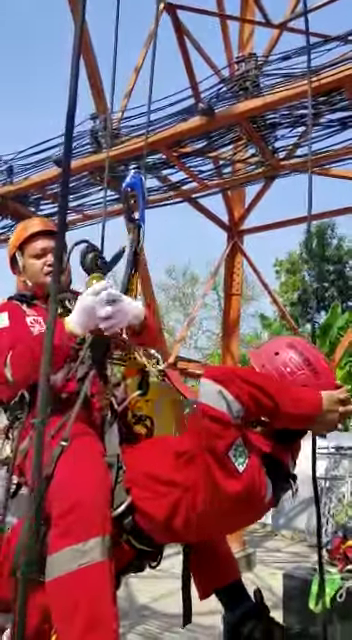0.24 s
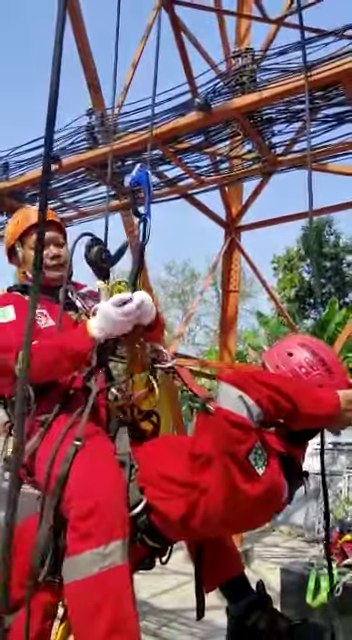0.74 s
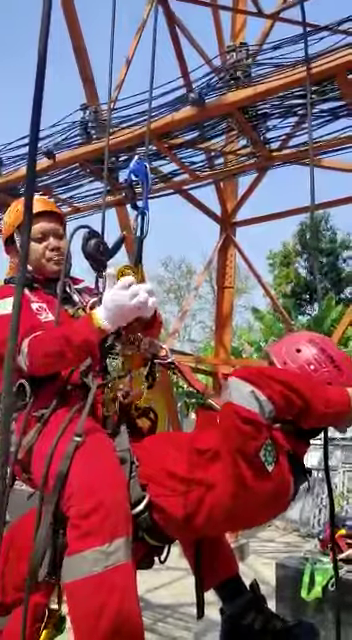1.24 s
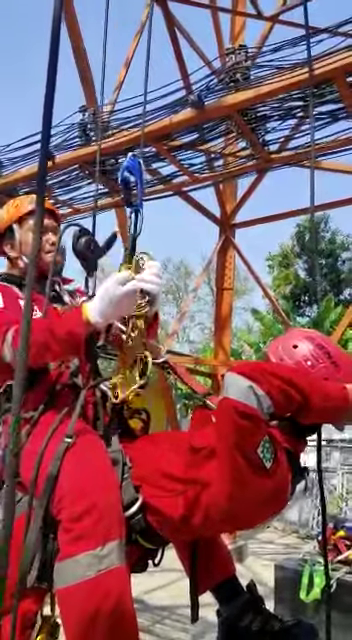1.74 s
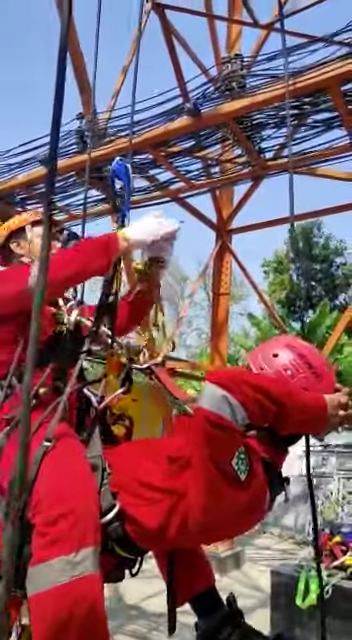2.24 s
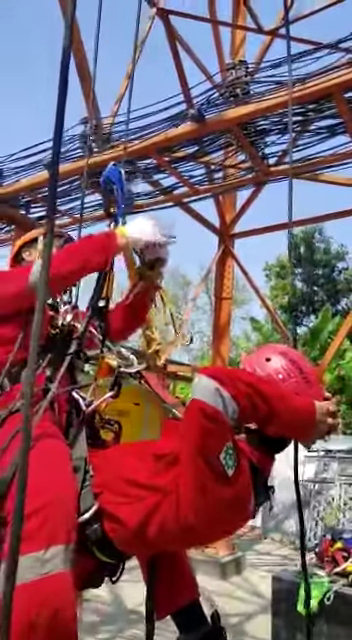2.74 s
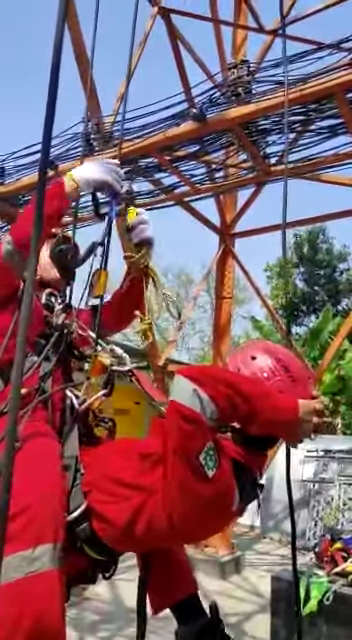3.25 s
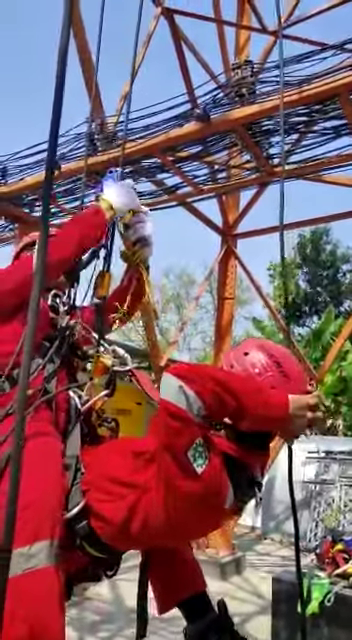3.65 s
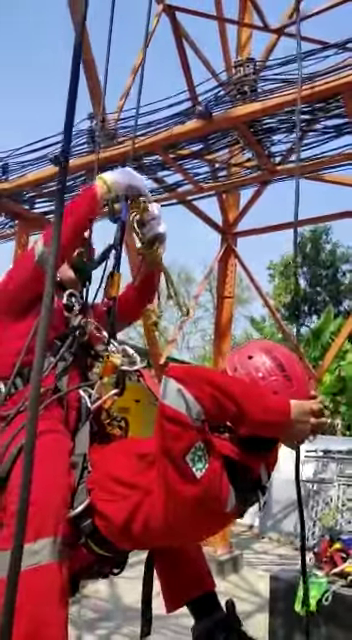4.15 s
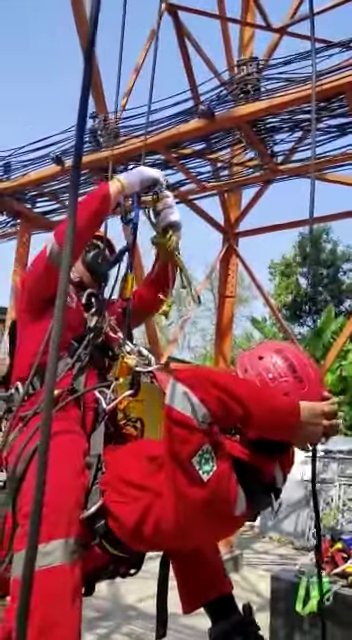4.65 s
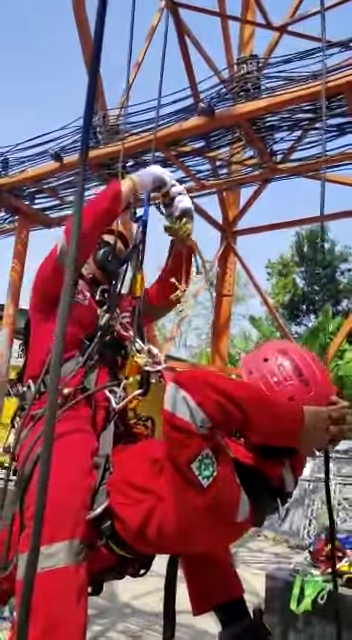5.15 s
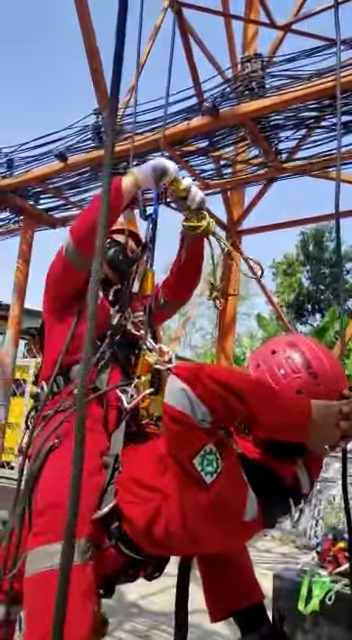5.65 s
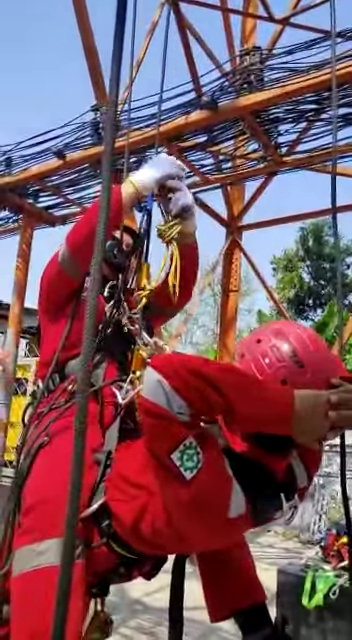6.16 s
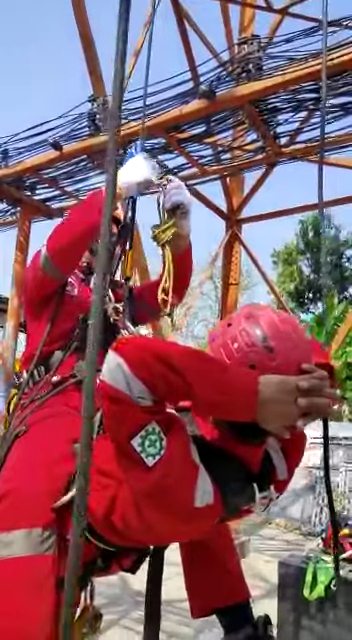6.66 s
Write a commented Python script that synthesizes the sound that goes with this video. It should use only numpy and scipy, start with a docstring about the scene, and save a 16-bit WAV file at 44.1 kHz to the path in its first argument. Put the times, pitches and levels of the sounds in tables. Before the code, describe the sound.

Close by, metal climbing clips click and clink in small irregular groups, with faint squeaks and short ringing tails. Hard surroundings give a brief echo. Behind, mostly to the right, a dull low drone swells and fades with hollow hoots and faint hiss. Near six seconds a sprung gate snaps shut, by far the loudest sound, followed by low buffeting on the microphone and more clinks.

```python
"""Rope rescue hardware under a steel frame

Rope rescuers handle their hardware: carabiners click and clink in gloved hands, built from contact noise and
metal modes. Rubbed metal squeaks and struck metal lingers in bands of noise; one sprung gate snaps shut.
Hard surroundings answer. Behind them a dull outdoor drone of filtered noise swells and fades, with hollow
hoots, faint rustle and hiss. Near the end a low rumble buffets the microphone."""
import sys
import numpy as np
from scipy import signal
from scipy.fft import rfft, irfft, next_fast_len
from scipy.io import wavfile
from scipy.ndimage import uniform_filter1d, map_coordinates

SR = 44100
rng = np.random.default_rng(int(sys.argv[2]) if len(sys.argv) > 2 else 0)


def int16_out(signal):
    """Quantize to a 16-bit WAV file."""
    q = np.round(np.clip(np.atleast_2d(signal).T, -1, 1) * 32767)
    wavfile.write(sys.argv[1], SR, q.astype(np.int16))


N = 303849  # length of the scene in samples
SIDES = np.array([[1], [-1]])  # left, right


def amp(db):
    """Turn decibels into a gain."""
    return 10 ** (np.asarray(db) / 20)


def unit(x):
    """Scale a signal to an rms of 1."""
    return x / np.sqrt(np.mean(x ** 2) + 1e-20)


def balance(left_db):
    """Gains that make the left side this many dB stronger than the right."""
    return amp(left_db / 2 * SIDES)


def along(points, hz):
    """Read a curve of (Hz, value) points on a log frequency axis."""
    f, v = np.transpose(points)
    return np.interp(np.log(hz + 1), np.log(f + 1), v)


def over_time(points):
    """Draw straight lines between (seconds, value) points, one value per sample."""
    s, v = np.transpose(points)
    return np.interp(np.arange(N) / SR, s, v)


def filtered(x, response):
    """Multiply the spectrum of x by a complex response of frequency."""
    n = x.shape[-1]
    m = next_fast_len(n + 8192)  # spare room for the filter's tail
    return irfft(rfft(x, m) * response(np.fft.rfftfreq(m, 1 / SR)), m)[..., :n]


def coloured(x, points):
    """Pass x through a smooth (Hz, dB) curve."""
    return filtered(x, lambda hz: amp(along(points, hz)))


def bump(hz, centre_hz, width_hz):
    """A resonance curve of height 1."""
    return 1 / (1 + ((hz - centre_hz) / width_hz) ** 2)


def resonating(x, gain_db):
    """Pass x through a body with this gain over frequency; it rings only after it is struck."""
    n = x.shape[-1]
    cepstrum = irfft(np.log(amp(gain_db(np.fft.rfftfreq(2 * n, 1 / SR)))))
    # folding the cepstrum gives minimum phase, so no sound comes before the strike
    cepstrum[1:n] *= 2
    cepstrum[n + 1:] = 0
    return irfft(rfft(x, 2 * n) * np.exp(rfft(cepstrum)))[..., :n]


def envelope(s, length, rise_s, fall_s):
    """A smooth rise up to time s, a hold, a smooth fall."""
    ramp = np.interp(np.arange(N) / SR, [s - rise_s, s, s + length, s + length + fall_s], [0, 1, 1, 0])
    return ramp * ramp * (3 - 2 * ramp)


def swelling(rows, rise_s, fall_s):
    """The gain of a row of swells: the strongest one at each moment."""
    return np.max([amp(db) * envelope(s, length, rise_s, fall_s) for s, length, db in rows], axis=0)


def wobble(rate):
    """A smooth random curve with this many knots a second."""
    return map_coordinates(rng.standard_normal(256), [np.arange(N) * rate / SR], mode="mirror")


def add(track, s, sound):
    """Mix a sound in at time s."""
    part = track[..., max(round(s * SR), 0):][..., :sound.shape[-1]]
    part += sound[..., :part.shape[-1]]


def ports(x, lag_ms):
    """A sound reaches the left microphone a little after the right."""
    return filtered(x, lambda hz: np.exp(-1j * np.pi * hz * lag_ms / 1000 * SIDES))


def rush(spectrum, apart_db, left_db, patchy_db, lag_ms):
    """Stereo noise of rms 1 in patches of random gain: a shared part and each side's own."""
    z = signal.stft(rng.standard_normal((3, N)), nperseg=1024)[2]
    field = uniform_filter1d(rng.standard_normal(z.shape[1:]), size=4, axis=0)
    field = uniform_filter1d(field, size=6, axis=1)
    noise = signal.istft(z * amp(patchy_db * unit(field)), nperseg=1024)[1][:, :N]
    pair = ports(noise[0], lag_ms) + amp(apart_db) * noise[1:]
    return unit(coloured(pair * balance(left_db), spectrum))


# How long the late echo lasts. Each row: frequency in Hz, time to fall by 60 dB in seconds.
YARD = [(300, 0.38), (2000, 0.42), (7000, 0.33), (10000, 0.31), (15000, 0.28)]


def yard(x, early_db, late_db, early_t60):
    """Near surfaces answer at once, the wider yard dies away more slowly."""
    hz, t, z = signal.stft(rng.standard_normal((2, SR // 2)), SR, nperseg=256)
    late = signal.istft(z * amp(-60 * t / along(YARD, hz)[:, None]), SR, nperseg=256)[1]
    t = np.arange(late.shape[1]) / SR
    build = 1 - np.exp(-(t / 0.0009) ** 2)
    early = rng.standard_normal(late.shape) * amp(-60 * t / early_t60)
    answer = amp(early_db) * unit(early * build) + amp(late_db) * unit(late * build)
    return signal.fftconvolve(x[None], answer / np.sqrt(len(t)), axes=1)[:, :len(x)]


# Tone of the rustle, the low air and the hiss. Each row: frequency in Hz, relative level in dB.
RUSTLE = [(200, -54.5), (700, -3), (1100, -3), (1450, -9), (2400, -10), (2800, -20), (4000, -37.5),
          (7000, -120)]
BREEZE = [(12, -31), (20, -15), (49, -1.5), (168, -6), (189, -1.5), (230, -5), (300, -26.5), (510, -120)]
HISS = [(1000, 4), (2400, -2.5), (3000, 0.5), (4000, -3.5), (5500, -0.5), (7000, 5.5), (8000, -4),
        (9000, -15.5), (15000, -17.5)]
# Loudness of the light rustle. Each row: time in seconds, level in dB.
LEAVES = [(0, -74.5), (1.9, -73), (2.75, -70), (3.3, -71.5), (4.4, -68), (5.1, -70.5), (6.89, -69.5)]
# Puffs of low air on the microphone. Each row: time of the peak in seconds, level in dB.
PUFFS = [(.09, -59), (2.06, -56), (4.14, -59.5), (4.94, -67), (5.66, -64)]
PUFF_RISE_S, PUFF_FALL_S = 0.059, 0.14
AIR_DB, AIR_WANDER_DB, AIR_WANDER_PER_S = -65, 2.53, 5  # middle level, size and rate of its wandering


def outdoors():
    """Filtered noise as faint rustle, low air that wanders and puffs on the microphone, and hiss."""
    rustle = amp(over_time(LEAVES)) * rush(RUSTLE, apart_db=4.5, left_db=2.0, patchy_db=5.5, lag_ms=0.11)
    puffs = sum(amp(db) * envelope(s, 0, PUFF_RISE_S, PUFF_FALL_S) for s, db in PUFFS)
    air_gain = np.hypot(amp(AIR_DB + AIR_WANDER_DB * wobble(AIR_WANDER_PER_S)), puffs)
    air = air_gain * rush(BREEZE, apart_db=-20.0, left_db=-1.5, patchy_db=-1.5, lag_ms=0.16)
    hiss = amp(-85.5) * rush(HISS, apart_db=9.0, left_db=-0.5, patchy_db=3.0, lag_ms=0)
    return rustle + air + hiss


# Tone of the drone, its upper register and its surge. Each row: frequency in Hz, relative level in dB.
HUM = [(60, -65), (130, -34.5), (210, -6.5), (280, 5), (345, 5.5), (410, -6), (520, -16), (900, -70.5),
       (2500, -120)]
UPPER = [(200, -65), (350, -27), (480, -6.5), (570, 1), (660, -0.5), (770, -18.5), (1200, -55),
         (3500, -120)]
SURGE_TONE = [(150, -62), (330, -9), (430, 7.5), (520, -0.5), (620, -19.5), (1000, -62), (2500, -120)]
# Swells of the drone. Each row: start of the hold in seconds, length of the hold in seconds, level in dB.
SWELLS = [(.04, 0.061, -54), (.46, 0.039, -56), (.62, 0.11, -56.5), (1.0, 0.18, -59.5), (1.18, 0.29, -54.5),
          (1.55, 0.11, -61), (1.93, 0.045, -56.5), (1.99, 0.23, -54.5), (2.2, 0.044, -53),
          (2.58, 0.12, -53.5), (2.89, 0.19, -53.5), (3.49, 0.11, -59.5), (3.61, 0.33, -53),
          (4.07, 0.08, -51), (4.24, 0.15, -57.5), (4.47, 0.13, -49.5), (4.7, 0.15, -61.5),
          (5.06, 0.16, -54.5), (5.45, 0.029, -51.5), (5.67, 0.026, -45.5), (6.16, 0.32, -63.5)]
SWELL_RISE_S, SWELL_FALL_S, HUM_REST_DB = 0.031, 0.11, -66.5  # shape of every swell; level between them
# Gain of the drone's lowest register. Each row: time in seconds, gain in dB.
HUM_LOW = [(4.8, 2), (5.2, -9.5)]
# Loudness of the upper register. Each row: time in seconds, level in dB.
UPPER_LEVEL = [(0, -74), (2.4, -76.5), (3.1, -71), (3.55, -76), (3.95, -66.5), (4.4, -61), (4.7, -68),
               (5.2, -75.5), (5.6, -70), (5.85, -60), (6.45, -68), (6.89, -78)]
SURGE_S, SURGE_HOLD_S, SURGE_RISE_S, SURGE_FALL_S, SURGE_DB = 4.08, 0.19, 0.14, 0.13, -49
SURGE_WAKE_S, SURGE_WAKE_DB = 0.4, -58.5  # a weaker wake outlasts the surge


def drone():
    """Low bands of noise from the right swell again and again, vary in the upper register and surge once."""
    hum_gain = np.hypot(amp(HUM_REST_DB), swelling(SWELLS, SWELL_RISE_S, SWELL_FALL_S))
    hum = hum_gain * rush(HUM, apart_db=-9.5, left_db=-7.5, patchy_db=3, lag_ms=0.33)
    low = filtered(hum, lambda hz: 1 / (1 + (hz / 315) ** 16))
    hum = hum - low + amp(over_time(HUM_LOW)) * low
    upper = amp(over_time(UPPER_LEVEL)) * rush(UPPER, apart_db=-2.5, left_db=-4.5, patchy_db=5.0, lag_ms=0.31)
    surge_rows = [(SURGE_S, SURGE_HOLD_S, SURGE_DB), (SURGE_S, SURGE_WAKE_S, SURGE_WAKE_DB)]
    surge_gain = swelling(surge_rows, SURGE_RISE_S, SURGE_FALL_S)
    surge = surge_gain * rush(SURGE_TONE, apart_db=6.0, left_db=-13.0, patchy_db=7.0, lag_ms=0.13)
    return hum + upper + surge


# Brief hollow hoots. Each row: start of the hold in seconds, its length in seconds, pitch in Hz, level in dB.
HOOTS = [(0.531, 0.013, 618, -65.5), (2.034, 0.023, 963, -66), (2.753, 0.043, 1070, -66),
         (2.85, 0.034, 613, -59.5), (3.335, 0.067, 620, -62), (4.157, 0.082, 550, -57.5),
         (5.678, 0.047, 605, -58.5), (6.203, 0.17, 616, -62.5), (6.58, 0.086, 592, -61),
         (6.772, 0.075, 575, -61)]
HOOT_RISE_S, HOOT_FALL_S, HOOT_WIDTH_HZ = 0.02, 0.026, 80


def hoots():
    """Each hoot is a narrow band of noise that comes and goes quickly, a little to the right."""
    out, t = np.zeros((2, N)), np.arange(SR // 2) / SR
    for s, length, pitch_hz, db in HOOTS:
        noise = rng.standard_normal((3, len(t)))
        band = unit(filtered(noise, lambda hz: bump(hz, pitch_hz, HOOT_WIDTH_HZ) ** 2))
        shape = np.interp(t, np.cumsum([0, HOOT_RISE_S, length, HOOT_FALL_S]), [0, 1, 1, 0])
        pair = (band[0] + amp(-1.0) * band[1:]) * amp([[-4], [0]])  # a shared part and each side's own
        add(out, s - HOOT_RISE_S, amp(db) * shape * unit(pair))
    return out


# Tone of the rumble. Each row: frequency in Hz, relative level in dB.
BUFFET = [(12, -40.5), (20, -14), (76, 2.5), (140, -4), (203, -12), (228, -32), (258, -16.5), (331, -49),
          (400, -61), (520, -67.5), (880, -120)]
# Gusts on the microphone. Each row: start of the hold in seconds, length of the hold in seconds, level in dB.
GUSTS = [(5.98, 0.027, -50), (6.11, 0.35, -41.5), (6.38, 0.047, -36.5), (6.55, 0.183, -45),
         (6.78, 0.014, -46.5)]
GUST_RISE_S, GUST_FALL_S = 0.046, 0.12
# Soft bumps on the microphone. Each row: start in seconds, pitch in Hz, level in dB.
THUMPS = [(6.1, 89.5, -29), (6.4, 123, -33.5)]


def buffeting():
    """Low noise rumbles in lumps, with two soft short tones as thumps, mostly on the right microphone."""
    gain = swelling(GUSTS, GUST_RISE_S, GUST_FALL_S)
    out = gain * rush(BUFFET, apart_db=1.0, left_db=-13, patchy_db=1.5, lag_ms=0.1)
    t = np.arange(SR // 5) / SR
    swell = np.exp(-((t - 0.018) / 0.011) ** 2)
    for s, hz, db in THUMPS:
        add(out, s, amp(db) * swell * np.sin(2 * np.pi * hz * t) * amp([[-11], [0]]))
    return out


# Rubbed metal, and the lingering ring of struck metal: narrow squeaks, wide scrapes, fading clink tails.
# Each row: start in seconds, length in seconds, pitch in Hz, width of the band in Hz, level in dB.
METAL_BANDS = [(0, 0.04, 6430, 1380, -65), (0, 0.041, 2510, 304, -63), (0.178, 0.078, 5000, 620, -71),
               (0.235, 0.15, 5000, 560, -69), (0.313, 0.044, 3120, 220, -63), (0.42, 0.107, 2500, 256, -70),
               (0.51, 0.19, 2390, 398, -73.5), (2.698, 0.26, 5850, 200, -64),
               (3.236, 0.029, 3000, 1200, -62.5), (5.283, 0.16, 2110, 170, -67),
               (5.551, 0.28, 4940, 1030, -64.5), (6.46, 0.14, 2493, 250, -67),
               (6.597, 0.29, 2340, 137, -73)]
WAVER, WAVER_PER_S = 0.005, 49  # the pitch wavers: share of the pitch, knots a second
HARDWARE_LAG_MS = 0.12  # the left microphone hears the hardware later


def squeaks_and_tails():
    """Rubbed metal, or the tail of a clink, is a band of noise with a weak higher band and faint grit."""
    out, t = np.zeros((2, N)), np.arange(SR) / SR
    for s, length, pitch_hz, width_hz, db in METAL_BANDS:
        def band(hz):
            main = bump(hz, pitch_hz, width_hz) ** 2
            higher = amp(-27) * bump(hz, 1.69 * pitch_hz, 2 * width_hz) ** 2
            grit = amp(-26) * bump(hz, pitch_hz, pitch_hz / 2) ** 2
            return main + higher + grit
        swell = np.sin(np.pi * np.clip(t / length, 0, 1) ** 0.5) ** 2  # quick rise, slower fall
        flicker = amp(7.3 * unit(uniform_filter1d(rng.standard_normal(SR), size=200)))
        tone = filtered(flicker * rng.standard_normal(SR), band)
        travel = np.cumsum(1 + WAVER * wobble(WAVER_PER_S)[:SR])  # uneven reading speed bends the pitch
        x = amp(db) * swell * unit(map_coordinates(tone, [travel]))
        add(out, s, ports(x, HARDWARE_LAG_MS) + yard(x, early_db=3.0, late_db=-4.5, early_t60=0.1))
    return out


# Carabiner modes. Each row: frequency in Hz, level in dB before a random change, and the time to
# fall by 60 dB in seconds, before each kind of contact scales it by its ring setting.
METAL = [(1720, -2.5, 0.0033), (2102, -5.5, 0.023), (2270, -3.5, 0.034), (3080, -21.5, 0.0073),
         (3770, -17, 0.012), (4585, -1, 0.07), (4800, -19.5, 0.0063), (6140, -7, 0.11), (6780, -25.5, .035),
         (6414, -3.5, 0.024), (6060, 8.5, 0.0059), (7530, -15.5, 0.0078), (7094, 7, 0.036),
         (7290, -2.5, 0.13), (8100, -19, 0.019), (9200, -11, 0.0036), (10090, -13.5, 0.049),
         (10700, -15, 0.041), (13500, -32.5, .05)]
# Tone of the contact noise. Each row: frequency in Hz, relative level in dB.
CRACK = [(200, -42.5), (1100, -32), (1750, -7.5), (3000, -4.5), (4000, 4.5), (5500, 0), (7000, 4),
         (8600, -11.5), (10200, -18.5), (12000, -17), (15500, -25.5)]
BITE, BITE_S = 0.81, 0.00027  # the first instant is harder: extra gain, how quickly it fades


def contact(tone_db, ring, crack_db, crack_t60, detune):
    """Metal meets metal: noise plus modes, in other phases for each microphone; the first 5 ms have rms 1."""
    t = np.arange(4096) / SR
    hz, db, t60 = np.transpose(METAL)[:, :, None]
    size, shift = rng.standard_normal((2, len(METAL), 1))
    phase = rng.random((2, len(METAL), 1))
    fading = amp(db + 2 * size - 60 * t / (t60 * ring))
    modes = fading * np.sin(2 * np.pi * (hz * (1 + detune * shift) * t + phase))
    crack = unit(coloured(rng.standard_normal((2, len(t))), CRACK)) * amp(crack_db - 60 * t / crack_t60)
    attack = (1 - np.exp(-t / 0.0004)) * (1 + BITE * np.exp(-t / BITE_S))
    x = resonating((modes.sum(1) + crack) * attack, tone_db)  # coloured by the struck spot
    return x / np.std(x[:, :SR // 200])


# The gate slams and bounces. Each row: start in seconds, level in dB.
SNAP = [(6.0457, -21), (6.0469, -21), (6.0489, -20), (6.0502, -23), (6.0526, -19), (6.0553, -25),
        (6.057, -27)]
# Tone of the snap. Each row: frequency in Hz, gain in dB.
SNAP_TONE = [(600, -2.5), (1100, -4), (1500, -2.5), (2000, -3.5), (3400, -14), (4350, -22.5), (5400, -3),
             (6400, 8.5), (7500, -1), (8500, 7), (10000, 8), (10600, 0.5), (13400, 3), (15000, 5)]
# Modes of the carabiner's loop, struck by its gate. Each row: frequency in Hz, width in Hz,
# lift of the snap in dB, level of the free ring in dB, time for that ring to fall by 60 dB in seconds.
LOOP = [(1690, 130, 6, -52, .3), (2950, 110, 5, -53, .25), (3780, 130, 5, -57, .25),
        (4760, 130, 8, -59, .3), (5695, 55, 10, -45, .25), (6290, 50, 6, -40, .3), (6412, 45, 9, -37, .25),
        (6503, 40, 7, -39, .3), (6715, 45, 6, -42, .28), (7080, 70, 6, -42, .3), (7381, 60, 10, -41, .28),
        (7697, 50, 6, -44, .28), (8255, 50, 6, -49, .2), (10084, 80, 9, -49, .2), (12004, 80, 10, -56, .2),
        (14120, 120, 11, -57, .2)]
# The snap's top beams to the right. Each row: frequency in Hz, left over right in dB.
SNAP_LEFT = [(2000, 6), (6400, 0.5), (8000, 1), (13000, -7)]
LOOP_BLUR = 0.023  # the shaking loop's ring is blurred: random phase step in radians a sample


def gate_snap():
    """The spring throws the gate against its nose; it chatters there for a hundredth of a second."""
    x = np.zeros((2, SR))
    start = SNAP[0][0]

    def tone_db(f):
        return along(SNAP_TONE, f) + sum(lift * bump(f, centre, width) for centre, width, lift, _, _ in LOOP)
    for s, db in SNAP:
        hit = contact(tone_db, ring=0.32, crack_db=18.5, crack_t60=0.005, detune=0.0046)
        add(x, s - start, amp(db) * hit)
    # the low body modes radiate all round, so the echo is darker than the direct snap
    spread = coloured(x, [(1500, 11), (4000, 15.5), (6500, -0.5), (10000, 6.0)])
    echo = sum(yard(face, early_db=-12, late_db=-15, early_t60=0.11) for face in spread)
    # the loop of metal rings on faintly in its own modes
    t = np.arange(SR) / SR
    hz, _, _, db, t60 = np.transpose(LOOP)[:, :, None]
    drift = LOOP_BLUR * np.cumsum(rng.standard_normal((len(LOOP), SR)), axis=1)
    phase = rng.random((2, len(LOOP), 1))
    ring = np.sum(amp(db - 60 * t / t60) * np.sin(2 * np.pi * (hz * t + phase) + drift), axis=1)
    heard = ports(x[0], HARDWARE_LAG_MS) + amp(-8) * x[1] * SIDES
    direct = filtered(heard + ring, lambda f: balance(along(SNAP_LEFT, f)))
    out = np.zeros((2, N))
    add(out, start, direct + echo)
    return out


REBOUND_SCATTER_DB = 4  # how uneven the rebounds are


def rebound(touch):
    """A lighter touch on a slightly different spot, with a colour of its own."""
    spot = unit(rng.standard_normal((1, 32))) / np.sqrt(32)
    return amp(REBOUND_SCATTER_DB * rng.standard_normal()) * signal.fftconvolve(touch, spot, axes=1)


# Resonances of the pulley's side plates. Each row: frequency in Hz, width in Hz, and lift in dB,
# before each click scales it by its share of the plates.
PLATES = [(1678, 230, 22), (2353, 130, 13.5), (3553, 340, 17.5), (4600, 400, 5), (5540, 150, 7.5),
          (6646, 110, 8.5), (7430, 230, 7.5), (8700, 200, -1.5), (9800, 60, 25), (11400, 400, 5.5),
          (14800, 500, 15)]
PLATES_DIP_DB = -9  # between those resonances, scaled the same way
BODY_OVERTONE, BODY_OVERTONE_DB = 1.3, 8  # the body's next mode: frequency ratio, lift


def touch_tone(clink_hz, body_hz, body_db, mid_db, edge_db, top_hz, plates):
    """The struck spot favours its clink and body modes; a softer touch loses its top."""
    tilt = [(1100, body_db - 19.0), (1700, body_db), (2800, body_db - 0.5), (4000, mid_db - 11.0),
            (5000, mid_db), (6200, 0), (7600, 0.0034), (9200, edge_db), (15000, edge_db)]

    def tone_db(hz):
        clink = 9 * bump(hz, clink_hz, width_hz=450)
        body = 10 * bump(hz, body_hz, width_hz=300)
        overtone = BODY_OVERTONE_DB * bump(hz, BODY_OVERTONE * body_hz, width_hz=260)
        side_plates = PLATES_DIP_DB + sum(lift * bump(hz, centre, width) for centre, width, lift in PLATES)
        soft = -10 * np.log10(1 + (hz / top_hz) ** 16)
        return along(tilt, hz) + clink + body + overtone + plates * side_plates + soft
    return tone_db


def ringing(hz, db, t60):
    """One mode rings on after the touch, in another phase for each microphone."""
    t = np.arange(SR // 2) / SR
    return amp(db - 60 * t / t60) * np.sin(2 * np.pi * (hz * t + rng.random((2, 1))))


# Light contacts, coloured by where they land. Each row: start in seconds, level in dB, clink mode in Hz,
# body mode in Hz, then body, mid and edge in dB relative to the clink, upper limit of the tone in Hz
# (lower for a softer touch), share of the side plates from 0 to 1, left over right in dB.
CLICKS = [(0.322, -62, 7500, 3050, 9, 7, 16, 9000, 0.1, -1),
          (0.337, -53.5, 7040, 3200, -2, 14, 16, 10400, 0.4, -7),
          (0.3814, -35.5, 6960, 2460, 6, 3, 9, 11200, 0, -4.5),
          (0.391, -52, 6800, 2450, 13.5, 8, 6, 9000, 0.1, 8),
          (0.3971, -56, 6940, 2040, 13, 9, 2, 9100, 0.1, 23),
          (0.4095, -57, 6660, 2466, 14, 25, 5, 10100, 0.1, 9),
          (0.5151, -36, 7060, 2398, 3, -1.5, -0.5, 14800, 0, -4.5),
          (0.606, -54, 7000, 2380, -26, 1, 3, 9050, 0, -1),
          (0.6356, -41, 7270, 2410, 7.5, 4.5, 6, 13100, 0, -3),
          (1.8834, -54.5, 7250, 3000, -12, -23, -2, 9600, 0.5, -4),
          (2.1614, -38.5, 6720, 2700, 1.5, 1.5, 3.5, 15000, 1, 5),
          (2.179, -47, 6800, 1650, -12, -15, -8, 9100, 0.9, 13),
          (2.218, -64, 6650, 2660, 16, 1, -7, 8860, 0.9, 19),
          (2.255, -60.5, 6800, 2650, 12.5, -3, 10, 9500, 0.3, -20),
          (3.2057, -37, 8100, 3750, -9.5, -13.5, 8.5, 15400, 0.53, -8),
          (3.2278, -42.5, 6270, 2550, -2, 4, 11, 15000, 0.3, -4),
          (3.3508, -58.5, 5970, 2500, -32, 3, 14, 11200, 0.2, -4),
          (3.815, -49.5, 6660, 1630, 7.5, 6, 7.5, 11800, 0.2, -5),
          (3.826, -55.5, 6700, 1674, 9, 0, -2, 9000, 0.7, 6),
          (3.834, -57, 6900, 2250, -8, 3, 10, 9950, .3, -6),
          (3.853, -51, 6360, 1620, -7, 3.5, 0, 11900, 0, -9),
          (4.7022, -61, 6850, 3570, 8, -2, 0, 7860, 1, 14),
          (4.716, -58.5, 8640, 3520, 0, -16, 13.5, 8880, 0, -9),
          (4.9924, -48.5, 5660, 2080, -20, -11, 4.5, 15100, 0.6, 4),
          (5.2945, -38, 6730, 2085, -3.5, -3, 7.5, 10400, 0, -3),
          (5.3647, -40.5, 7000, 1990, -6, -13, 6.5, 10400, 0.14, 7),
          (5.5387, -38, 8060, 3540, 1.5, 3.5, 3, 13800, 0.06, -7.5),
          (5.55, -47, 7230, 3430, 4, -8, -1, 13000, 0.3, 10),
          (5.568, -48, 7160, 3320, 7.5, -1, -19, 9000, 0.4, 1),
          (5.7, -51.5, 7000, 4600, 1, 6, -9, 13050, 0.1, 10),
          (5.7914, -36.5, 6710, 2750, -3.5, 2, 4.5, 15000, 0.15, 6),
          (6.278, -52.5, 7220, 2300, -10, -31, -22, 8500, .1, 4),
          (6.3354, -41.5, 6300, 2420, -16, -3.5, 1.5, 9400, 0.5, 1),
          (6.4642, -33, 6530, 2690, -15.5, -5, 1.5, 13300, 0.87, 2.5),
          (6.636, -60, 7300, 2240, -11, -18, 23, 12850, 0, 2),
          (6.6885, -39.5, 6420, 2360, -8, -2, 14, 14900, 0, 2)]
CLINK_RING_DB, CLINK_RING_T60 = -17, 0.1  # clink mode: level against the touch, seconds to fall 60 dB
BODY_RING_DB, BODY_RING_T60 = -18, 0.16  # body mode, added to the row's body level
REBOUND_DB, REBOUND_T60 = -18.5, 0.18  # rebound level before its decay, seconds to fall 60 dB
CHATTER_S, CHATTER_DB = 0.0025, -5  # the surfaces meet again: typical delay, level against the touch


def clicks():
    """Each touch lands elsewhere on the hardware, favours a clink and a body mode, and rebounds lightly."""
    out = np.zeros((2, N))
    for s, db, clink_hz, body_hz, body_db, mid_db, edge_db, top_hz, plates, left_db in CLICKS:
        tone_db = touch_tone(clink_hz, body_hz, body_db, mid_db, edge_db, top_hz, plates)
        touch = amp(db) * contact(tone_db, ring=0.14, crack_db=5.5, crack_t60=0.014, detune=0.034)
        x = np.zeros((2, SR * 2 // 3))
        add(x, 0, touch)
        add(x, CHATTER_S * rng.uniform(0.6, 1.4), amp(CHATTER_DB) * touch)
        add(x, 0, amp(db) * ringing(clink_hz, CLINK_RING_DB, CLINK_RING_T60))
        add(x, 0, amp(db) * ringing(body_hz, body_db + BODY_RING_DB, BODY_RING_T60))
        for delay in np.cumsum(rng.uniform(0.003, 0.012, size=11)):  # rebounds weaken on the whole
            add(x, delay, amp(REBOUND_DB - 60 * delay / REBOUND_T60) * rebound(touch))
        heard = amp(-2.5) * ports(x[0], HARDWARE_LAG_MS) + amp(-6.5) * x[1] * SIDES
        echo = yard(x[0], early_db=-8.0, late_db=-6.5, early_t60=0.18)
        add(out, s, heard * balance(left_db) + echo)
    return out


def scene():
    """Everything together, from the background to the clicks."""
    return outdoors() + drone() + hoots() + buffeting() + squeaks_and_tails() + gate_snap() + clicks()


TOP_HZ = 16200  # the recorder's band limit


def record(dry):
    """The recorder rounds off the highest peaks and cuts steeply above its band limit."""
    rounded = dry / (1 + (dry / 0.5) ** 6) ** (1 / 6)
    return filtered(rounded, lambda hz: 1 / (1 + (hz / TOP_HZ) ** 120))


dry = scene()
out = record(dry)
int16_out(out)
```